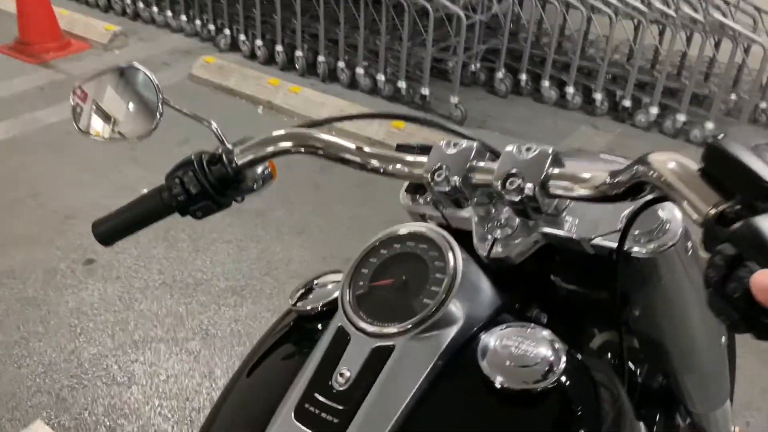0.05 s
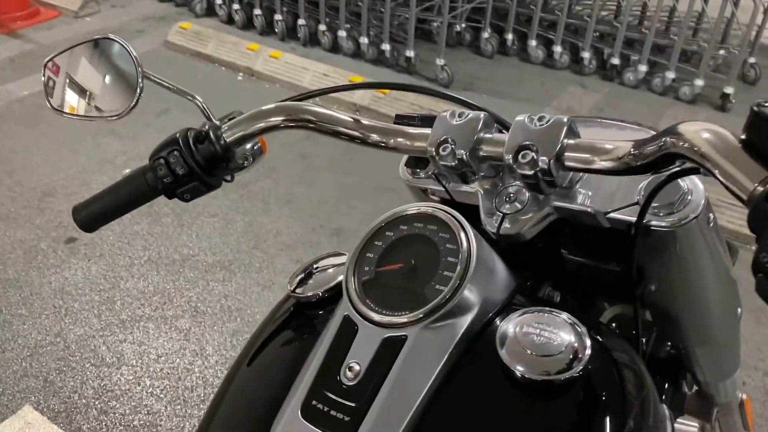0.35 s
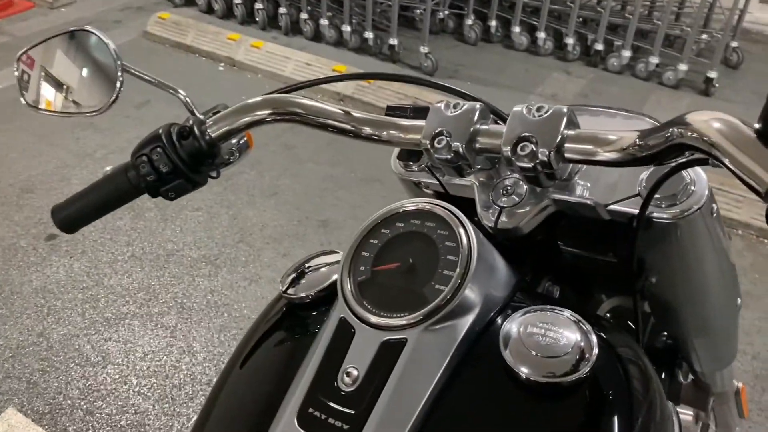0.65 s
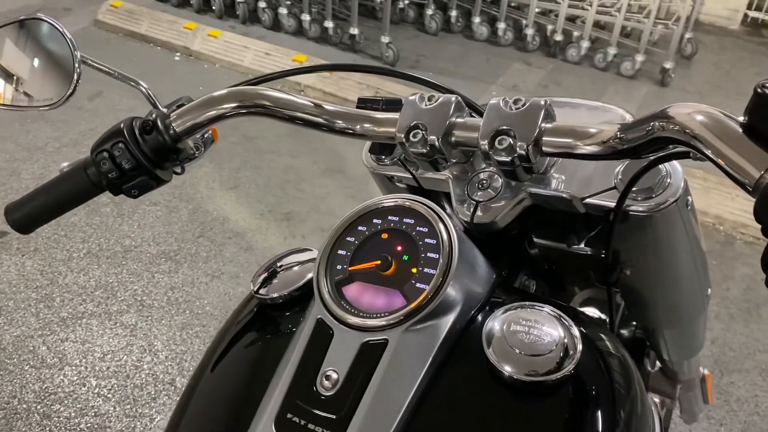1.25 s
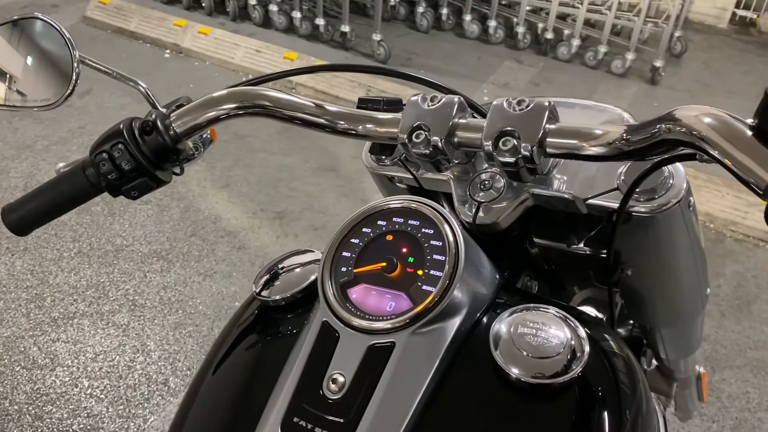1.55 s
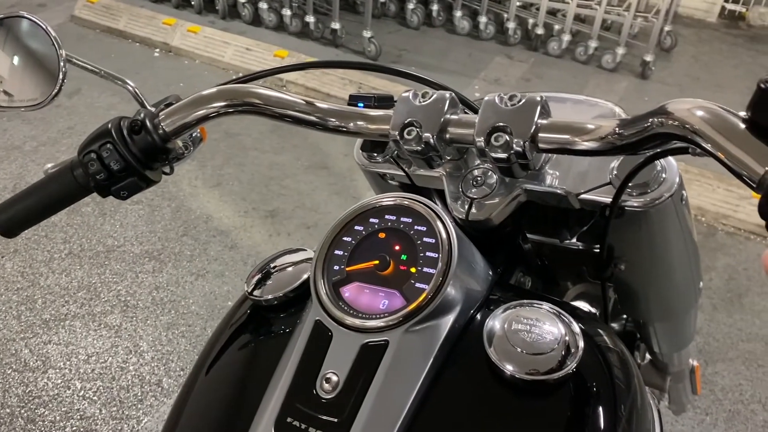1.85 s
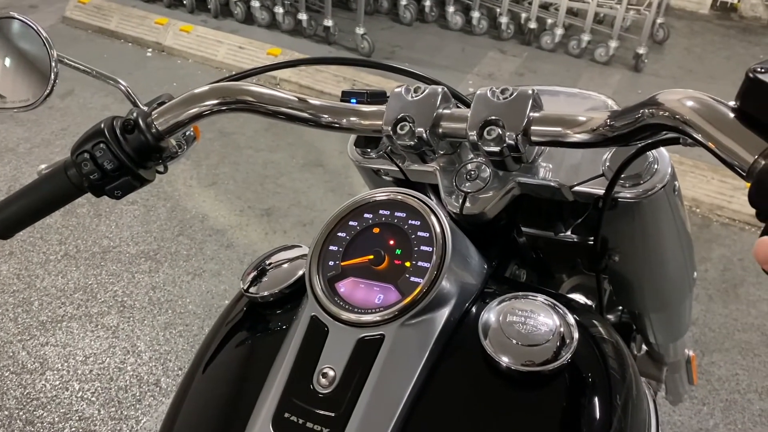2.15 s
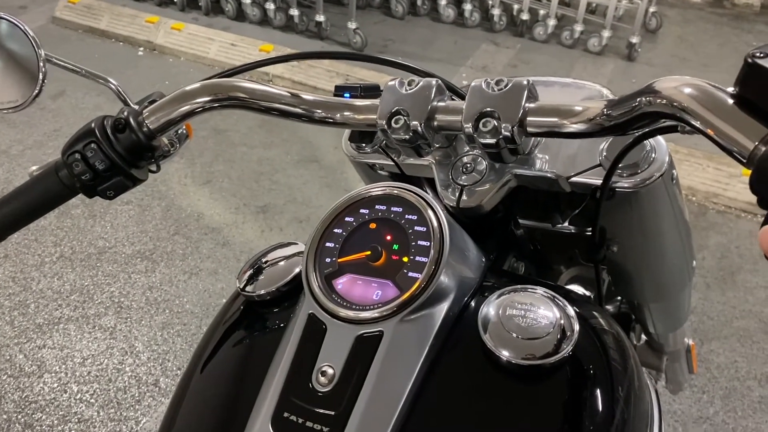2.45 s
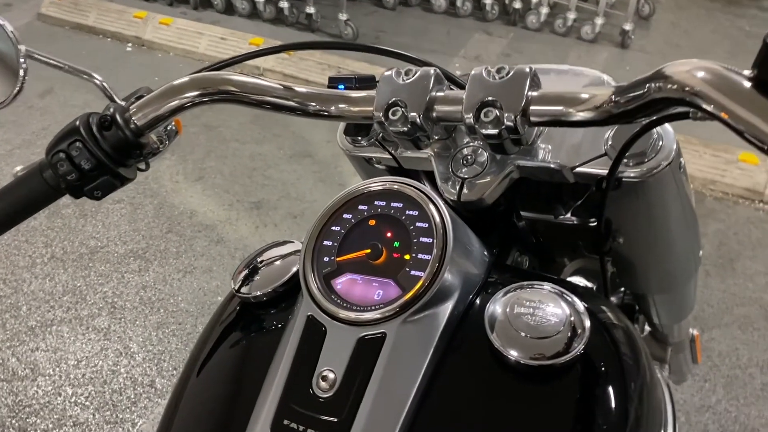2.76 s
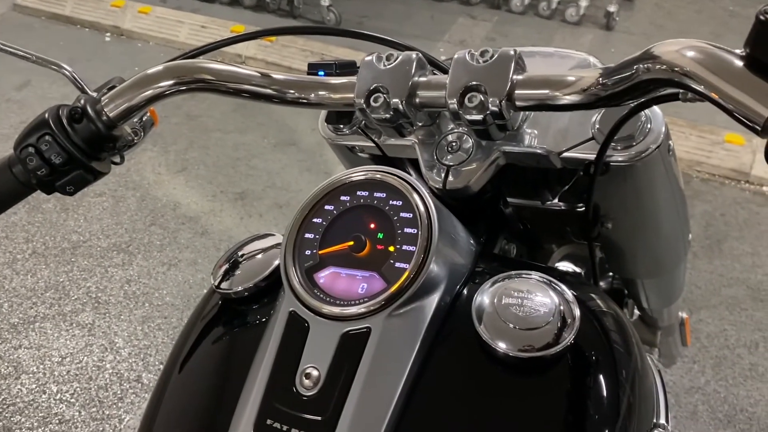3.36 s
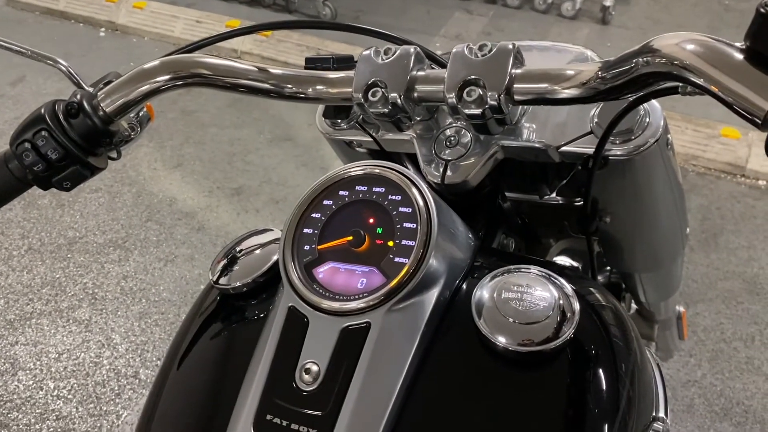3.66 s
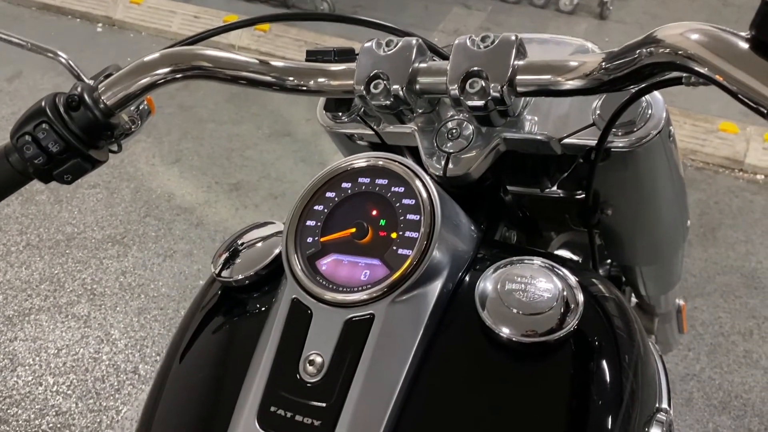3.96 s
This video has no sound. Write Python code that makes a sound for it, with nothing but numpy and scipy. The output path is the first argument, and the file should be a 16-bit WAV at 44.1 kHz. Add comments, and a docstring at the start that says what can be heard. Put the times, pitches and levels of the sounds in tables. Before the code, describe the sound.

A nearby motorcycle's fuel pump whirs and hisses for two seconds, preceded by plastic switch clicks and a metallic clack. Faint ticks and one heavy starter clunk follow, over the low ventilation hum of a covered car park.

```python
"""Ventilation hums in a covered car park, over a distant rumble that swells and ebbs.
A motorcycle's handlebar switches click, each impact ringing their plastic bodies. The fuel pump
primes for two seconds, with a metallic clack, a hiss of fuel and a whine that sags as pressure
builds. It stops with a soft knock; at the very end the starter slams into gear.
The concrete hall adds its reverberation to the motorcycle's sounds."""
import sys
import numpy as np
from scipy import signal
from scipy.fft import rfft, irfft
from scipy.io import wavfile

SR = 44100
rng = np.random.default_rng(int(sys.argv[2]) if len(sys.argv) > 2 else 0)


def store_wav(level_fs):
    """Save 16-bit WAV to argv[1]."""
    pcm = np.round(np.clip(np.atleast_2d(level_fs), -1, 1) * 32767)
    wavfile.write(sys.argv[1], SR, pcm.T.astype(np.int16))


N = 176400
T = np.arange(N) / SR
F = np.fft.rfftfreq(N, 1 / SR)


def amp(db):
    """Decibels to amplitude ratio."""
    return 10 ** (np.asarray(db) / 20)


def unit(x):
    """Normalise to rms 1."""
    return x / np.sqrt(np.mean(x ** 2) + 1e-20)


def over_time(points):
    """Interpolate (t, value) points at every sample."""
    return np.interp(T, *np.array(points).T)


def over_hz(points, size=N):
    """Interpolate (f, value) points on a logarithmic frequency axis."""
    hz, values = np.array(points, float).T
    return np.interp(np.log(np.fft.rfftfreq(size, 1 / SR) + 1), np.log(hz), values)


def noise(spectrum, resonances=()):
    """Spectral shaping: white noise is coloured, then lifted at its resonances."""
    lift = sum(db * np.exp(-(2 * (F - hz) / width) ** 2) for hz, width, db in resonances)
    return unit(irfft(rfft(rng.standard_normal(N)) * amp(over_hz(spectrum) + lift), N))


def drift(rate_hz):
    """Low-pass noise: a smooth fluctuation of rms 1."""
    return unit(irfft(rfft(rng.standard_normal(N)) * np.exp(-(F / rate_hz) ** 2) * (F > 0), N))


def tone(phase, db):
    """A sinusoid of given rms level."""
    return np.sqrt(2) * amp(db) * np.sin(phase)


def place(x, pan_db):
    """Level panning: the left channel exceeds the right by pan_db."""
    return x * amp([[pan_db / 2], [-pan_db / 2]])


def through(x, response):
    """Convolution with an impulse response scaled to unit energy."""
    return signal.fftconvolve(x, response / np.linalg.norm(response))[:N]


def resonate(force, body, size=1024):
    """A body filters a stereo force as a minimum-phase system."""
    cepstrum = irfft(np.log(amp(over_hz(body, size))))
    cepstrum[1:size // 2] *= 2
    cepstrum[size // 2 + 1:] = 0
    response = irfft(np.exp(rfft(cepstrum)))
    return np.array([through(channel, response) for channel in force])


def contact(start, db, decay, pan_db, spread):
    """Tiny impacts die away exponentially; nearby surfaces add a part that differs left and right."""
    age = T - start
    envelope = amp(db) * (age >= 0) * np.exp(-np.clip(age / decay, 0, 20))
    direct, reflected = envelope * np.sign(rng.standard_normal((2, N)))
    return place(direct, pan_db) + spread * np.array([reflected, -reflected])


def blows(rows, body, spread):
    """Superposition: several contact forces drive one body."""
    return resonate(sum(contact(*row, spread) for row in rows), body)


def ring(start, modes, peak_db):
    """Free vibration: a struck body sounds as a sum of damped modes."""
    t = T[:N // 4]
    ringing = sum(amp(db - 60 * t / t60) * np.sin(2 * np.pi * hz * t) for hz, db, t60 in modes)
    ringing *= amp(peak_db) / np.abs(ringing).max()
    return np.pad(ringing, (int(start * SR), N))[:N]


# Air noise spectrum: f/Hz, relative level/dB
AIR_SPECTRUM = [(15, -45), (25, -27), (48, -4.5), (69, -6.5), (102, -2.5), (124, -9), (150, -2.5),
                (220, -7.5), (300, -10), (357, -16), (440, -16.5), (730, -24), (900, -21), (1700, -33),
                (2500, -32.5), (3200, -37.5), (4500, -43.5), (6000, -51.5), (7100, -48.5), (8600, -61.5),
                (10100, -53.5), (13000, -68), (16000, -66)]
# Left-right correlation of the air noise: f/Hz, coefficient
AIR_CORRELATION = [(60, 0.95), (130, 0.85), (300, 0.67), (640, -0.39), (1400, -0.13), (3000, 0.66),
                   (6800, -0.16), (15000, -0.45)]
# Fan tones: f/Hz, level/dB
FAN_TONES = [(100, -42.5), (149, -60.5), (297.5, -51.5), (444, -60.5), (975, -65.5)]
def ventilation():
    """Distant fans radiate wavering tones and broadband noise, coherent at both ears in the bass."""
    correlation = over_hz(AIR_CORRELATION)
    width = np.sqrt((1 - correlation) / (1 + correlation))
    mid = noise(AIR_SPECTRUM)
    side = irfft(rfft(noise(AIR_SPECTRUM)) * width, N)
    air = amp(-39.5 + 0.5 * drift(6.8)) * np.array([mid + side, mid - side])
    hum = np.zeros(N)
    for hz, db in FAN_TONES:
        phase = 2 * np.pi * np.cumsum(hz + 0.96 * drift(5.55)) / SR
        hum += tone(phase, db + 1.9 * drift(2.8))
    return air + hum


# Rumble spectrum: f/Hz, relative level/dB
RUMBLE_SPECTRUM = [(15, -17), (35, -3), (55, 4), (80, -1.5), (200, -28), (1000, -65)]
# Rumble envelope: t/s, level/dB
RUMBLE_ENVELOPE = [(0, -56), (.7, -51), (1.3, -45), (1.9, -42), (2.3, -59), (4, -51)]
def rumble():
    """Slow amplitude modulation makes a distant low noise swell and ebb."""
    return noise(RUMBLE_SPECTRUM) * amp(over_time(RUMBLE_ENVELOPE))


# Rocker and control impacts: t/s, level/dB, time constant/s, pan/dB
ROCKER_BLOWS = [(.1398, -33, 0.0063, 6), (.149, -38.5, 0.016, 2)]
TICK_BLOWS = [(.651, -69, 0.0077, 12), (.7244, -54, 0.0087, 4), (.738, -52, 0.018, 6),
              (.9325, -46, 0.0026, 1), (.958, -43, .006, 3), (.981, -47, 0.025, 4), (1.03, -68, .015, -3),
              (3.5144, -54.5, 0.024, 11), (3.6686, -53.5, 0.015, 5), (3.869, -59, 0.03, 9)]
# Their body responses: f/Hz, relative level/dB
ROCKER_RESPONSE = [(600, 0), (1400, -8), (1650, 4), (1900, -4), (2200, 2), (2700, -3), (3400, 1.5),
                   (4200, -9), (7000, -4), (9000, -15), (11500, -13.5), (16000, -12)]
TICK_RESPONSE = [(1000, -12), (2500, -3.5), (4700, -9), (6000, -17), (7200, -11), (9000, -21), (11500, -14),
                 (16000, -22)]
def light_clicks():
    """Impact excitation: a rocker switch and other plastic controls click when lightly struck."""
    rocker = blows(ROCKER_BLOWS, ROCKER_RESPONSE, spread=0.38)
    return rocker + blows(TICK_BLOWS, TICK_RESPONSE, spread=0.38)


# Snap impacts: t/s, level/dB, time constant/s, pan/dB
SNAP_BLOWS = [(.9455, -17, 0.0023, 9.5), (.9495, -33, 0.0015, 0)]
# Switch body response: f/Hz, relative level/dB
SNAP_RESPONSE = [(500, -43), (900, -26), (1200, -8), (2000, -9), (3100, -12), (4200, -10), (5000, 5.5),
                 (6200, -17), (7400, -8.5), (8600, -13), (11500, -15), (16000, -20)]
# Switch modes: f/Hz, relative level/dB, T60/s
PLASTIC_MODES = [(1220, -13.5, 0.035), (1940, -8, 0.015), (4260, -4.5, 0.019), (5160, -27, 0.013)]
def switch_snap():
    """A sharp impact excites the heavily damped modes of a plastic switch."""
    ringing = ring(SNAP_BLOWS[0][0], PLASTIC_MODES, peak_db=-16)
    return blows(SNAP_BLOWS, SNAP_RESPONSE, spread=0.45) + place(ringing, pan_db=1)


# Envelopes of the whine and of its fifth harmonic: t/s, level/dB
WHINE_ENVELOPE = [(1.12, -57), (1.25, -72), (1.55, -69.5), (1.85, -67.5), (2.0, -61), (2.35, -58.5),
                  (2.65, -56.5), (2.9, -61.5), (3.1, -63)]
FIFTH_ENVELOPE = [(1.15, -80), (1.3, -65), (1.9, -59), (2.2, -77), (2.45, -62), (2.7, -58), (2.9, -72),
                  (3.1, -70)]
# Whine spectrum: harmonic number, relative level/dB
WHINE_HARMONICS = [(1, 2.5), (2, -18), (4, -18)]
def pump_whine(phase):
    """Periodic vane passage radiates a harmonic series."""
    level = over_time(WHINE_ENVELOPE)
    whine = sum(tone(k * phase, level + db + 0.48 * drift(12)) for k, db in WHINE_HARMONICS)
    return whine + tone(5 * phase, over_time(FIFTH_ENVELOPE) + 1.5 * drift(10))


def flicker(x, centres_hz=(2510, 5500, 8500, 11500, 14500), depth_db=1.5):
    """Independent amplitude modulation of overlapping frequency bands."""
    bands = (over_hz(list(zip(centres_hz, row))) for row in np.eye(len(centres_hz)))
    return sum(irfft(rfft(x) * band, N) * amp(depth_db * drift(10)) for band in bands)


# Fuel noise spectrum: f/Hz, relative level/dB
FUEL_SPECTRUM = [(600, 8), (1000, 4), (1600, 1.5), (3000, -3.5), (4600, 2), (6000, -4), (7600, -1.5),
                 (11200, -2.5), (14600, 3.5), (16000, -14)]
# Its peaks and notches: f/Hz, width/Hz, gain/dB
FUEL_RESONANCES = [(3000, 74, 9.5), (3260, 50, 10), (4150, 27, 3.5), (7340, 130, 4.5), (8030, 130, 8.5),
                   (7800, 78, -4), (9700, 100, -9), (10130, 320, 9.5), (11140, 200, 9), (12000, 300, 2.5)]
def fuel_hiss(phase, load_s, vanes=9):
    """Flow noise pulses once per rotor turn and surges as the pump takes load."""
    surge_db = 10 * (T > load_s) * np.exp(-np.abs(T - load_s) / 0.43)
    pulsing = 1 + 0.16 * np.sin(phase / vanes)
    flow = amp(-57 + surge_db + 0.51 * drift(27)) * pulsing
    common, left, right = (noise(FUEL_SPECTRUM, FUEL_RESONANCES) for _ in range(3))
    return flow * flicker(place(common, pan_db=8.5) + 0.91 * np.array([left, right]))


def fuel_pump(on_s, load_s, off_s):
    """Pitch follows rotor speed, rising at spin-up and sagging under pressure; a coil sings steadily."""
    spin_up_s, fade_s = 0.018, 0.0061
    vane_hz, sag_hz_per_s, coil_hz = 2820, 28, 2004
    age = np.maximum(T - on_s, 0)
    speed = 1 - np.exp(-age / spin_up_s)
    envelope = speed ** 6 * np.exp(-np.maximum(T - off_s, 0) / fade_s)
    pitch_hz = speed * (vane_hz - sag_hz_per_s * age) + 1.3 * drift(25)
    phase = 2 * np.pi * np.cumsum(pitch_hz) / SR
    coil = tone(2 * np.pi * coil_hz * T, -66 + 1.2 * drift(5))
    spin_up_rasp = amp(-49) * (T < load_s) * drift(350) * np.sin(1.85 * phase)
    return envelope * (pump_whine(phase) + fuel_hiss(phase, load_s) + coil + spin_up_rasp)


# Clack impacts: t/s, level/dB, time constant/s, pan/dB
CLACK_BLOWS = [(1.153, -38, 0.005, 1), (1.157, -21, .006, -1), (1.168, -37, 0.046, -4),
               (1.195, -35, 0.024, 6)]
# Metal body response: f/Hz, relative level/dB
CLACK_RESPONSE = [(300, 2), (700, 0.5), (1400, -11), (2200, -4), (3000, 3), (4500, 6), (5600, -7),
                  (8300, 3.5), (14400, 6.5), (16000, -6)]
# Metal modes: f/Hz, relative level/dB, T60/s
METAL_MODES = [(2860, -8, 0.33), (2890, 7, 0.16), (3000, -2, .3), (3180, 5, 0.28), (3430, -9, 0.22),
               (3530, -16, 0.26), (4500, 4, 0.25), (4040, -7, .3), (4630, -10, 0.26), (4600, -16, .3),
               (10500, 4, .2), (11300, -9, .2), (11710, -1, .2), (14193, 10, 0.18)]
def pump_clack():
    """Lightly damped modes ring on after metal is struck as the pump takes load."""
    ringing = ring(CLACK_BLOWS[0][0], METAL_MODES, peak_db=-27)
    return blows(CLACK_BLOWS, CLACK_RESPONSE, spread=0.52) + place(ringing, pan_db=6)


# Stopping impacts: t/s, level/dB, time constant/s, pan/dB
KNOCK_BLOWS = [(3.109, -34.5, 0.0046, -1), (3.112, -39.5, 0.0026, 6)]
# Body response: f/Hz, relative level/dB
KNOCK_RESPONSE = [(400, -39), (900, -7), (1200, -4), (1850, 1.5), (2400, -3), (2800, -11), (3400, -8),
                  (4500, -18), (8000, -52), (16000, -51)]
def pump_knock():
    """Band-pass filtering by the body softens two impacts as the pump stops."""
    return blows(KNOCK_BLOWS, KNOCK_RESPONSE, spread=0.28)


# Starter impacts: t/s, level/dB, time constant/s, pan/dB, low-pass cutoff/Hz
STARTER_BLOWS = [(3.948, -36.5, 0.016, 4, 12000), (3.953, -28, 0.029, 12.5, 3500),
                 (3.9619, -10.5, 0.0026, -1, 13800), (3.9656, -10.5, .005, 2, 2800),
                 (3.975, -22.5, 0.034, 3, 3500), (3.987, -12, 0.0076, 5, 4500),
                 (3.9925, -7.5, 0.0084, 0, 1590)]
# Starter body response: f/Hz, relative level/dB
STARTER_RESPONSE = [(60, -35), (180, -5.5), (350, -4), (500, -11.5), (650, -6.5), (1000, -6.5),
                    (1350, -0.5), (1850, 1.5), (2300, -12), (3100, -2.5), (3900, -11.5), (4700, -7),
                    (5900, -17), (7100, -9), (8600, -18), (11300, -16), (14000, -14), (16000, -22)]
def starter():
    """Impact excitation: the solenoid pulls in and the pinion slams into the ring gear."""
    force = np.zeros((2, N))
    for *blow, cutoff_hz in STARTER_BLOWS:
        low_pass = signal.butter(1, cutoff_hz, fs=SR)
        force += signal.lfilter(*low_pass, contact(*blow, spread=0.38))
    return amp(2.5) * resonate(force, STARTER_RESPONSE)


def hall(x, wet_db, low_t60_s=1.0, high_t60_s=0.7):
    """Reverberation: a diffuse tail follows the direct sound, its treble dying first."""
    t = T[:N // 2]
    tails = []
    for channel in x:
        white = rng.standard_normal(len(t))
        low = signal.lfilter(*signal.butter(1, 4000, fs=SR), white)
        response = low * amp(-60 * t / low_t60_s) + (white - low) * amp(-60 * t / high_t60_s)
        tails.append(through(channel, response * (t > .006)))  # first reflection after 6 ms
    return x + amp(wet_db) * np.array(tails)


def scene():
    """Superposition of the background and the nearby motorcycle with its reverberation."""
    background = ventilation() + rumble()
    switches = hall(light_clicks(), wet_db=-7.5) + hall(switch_snap(), wet_db=-24)
    pump = fuel_pump(on_s=1.08, load_s=CLACK_BLOWS[0][0], off_s=3.11) + pump_clack() + pump_knock()
    return background + switches + hall(pump + starter(), wet_db=-15.5)


def record(dry):
    """The treble merges to mono and lags on the left; saturation rounds peaks, a low-pass cuts the top."""
    mono_above_hz, lag_above_hz, lag_s, top_hz = 6200, 6980, .000236, 16000
    f = np.fft.rfftfreq(2 * N, 1 / SR)
    spectrum = rfft(dry, 2 * N)
    mono_share = np.clip((f - mono_above_hz) / 400 + .5, 0, 1)
    spectrum = spectrum * (1 - mono_share) + spectrum.mean(axis=0) * mono_share
    spectrum[0] *= np.exp(-2j * np.pi * np.maximum(f - lag_above_hz, 0) * lag_s)
    rounded = np.tanh(irfft(spectrum)[:, :N])
    return signal.sosfilt(signal.ellip(8, .2, 80, top_hz, fs=SR, output="sos"), rounded)


dry = scene()
out = record(dry)
store_wav(out)
```